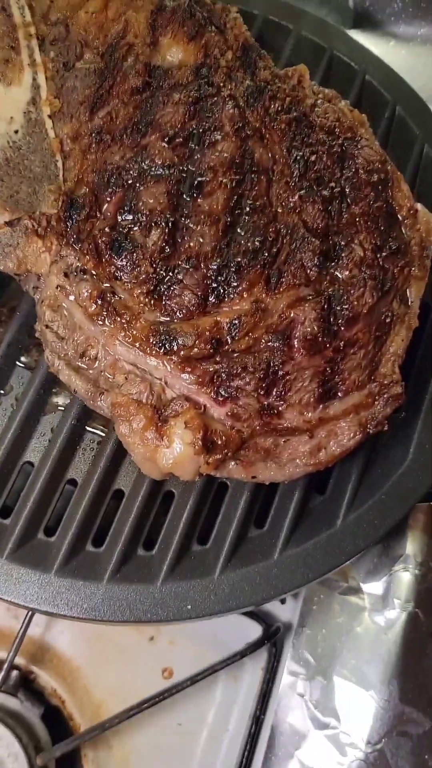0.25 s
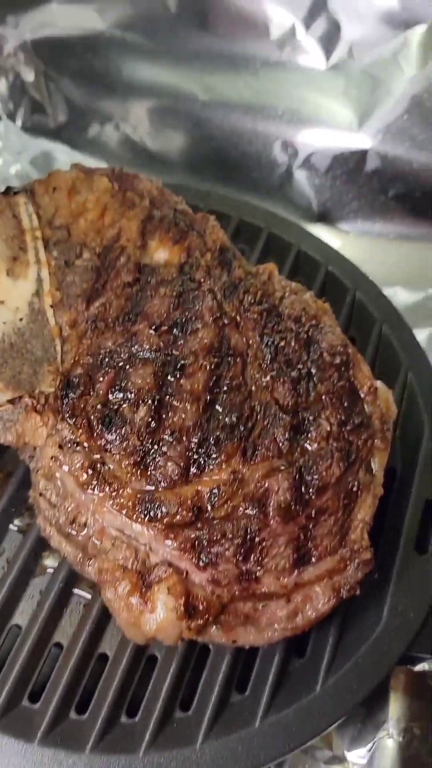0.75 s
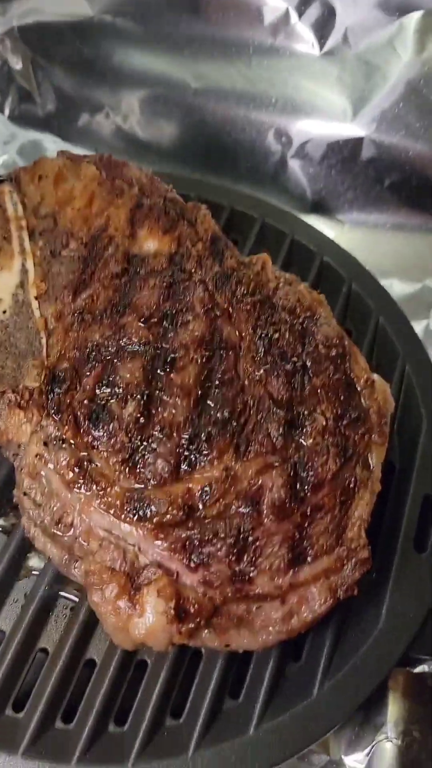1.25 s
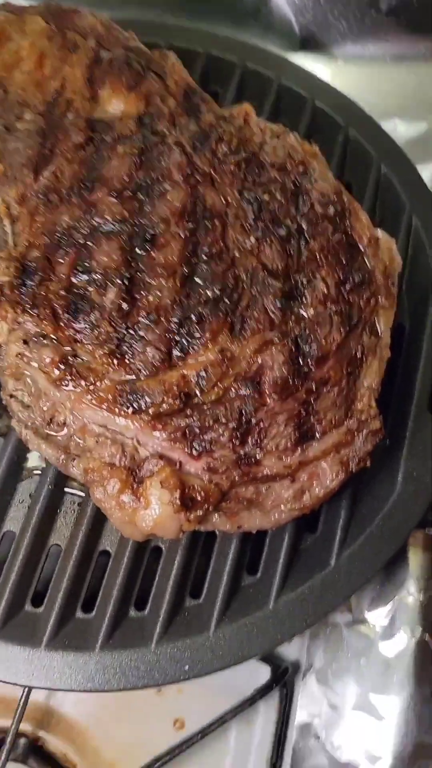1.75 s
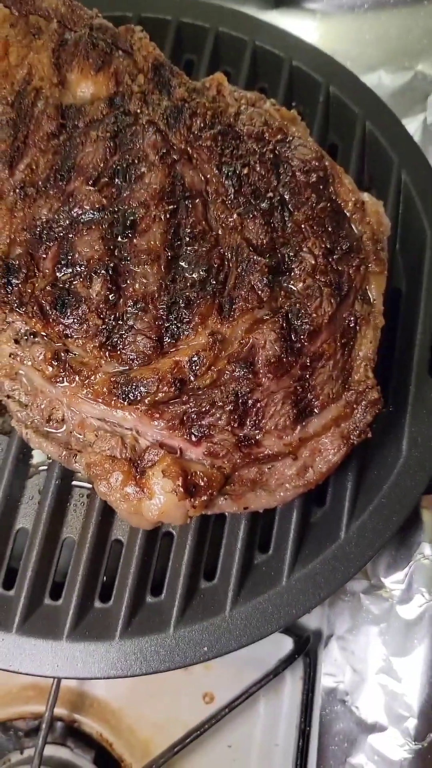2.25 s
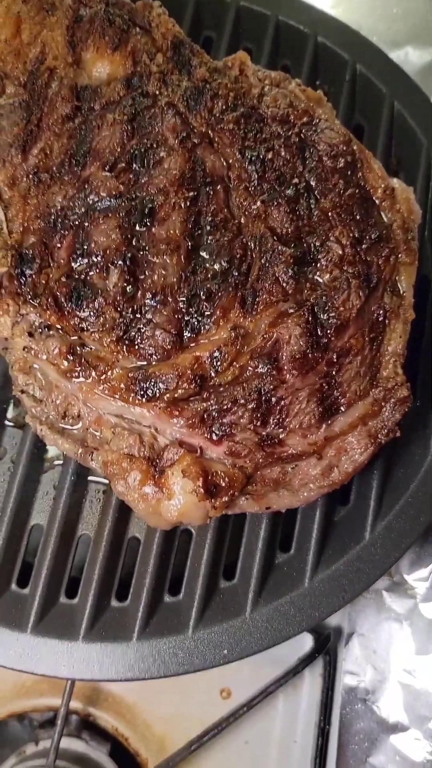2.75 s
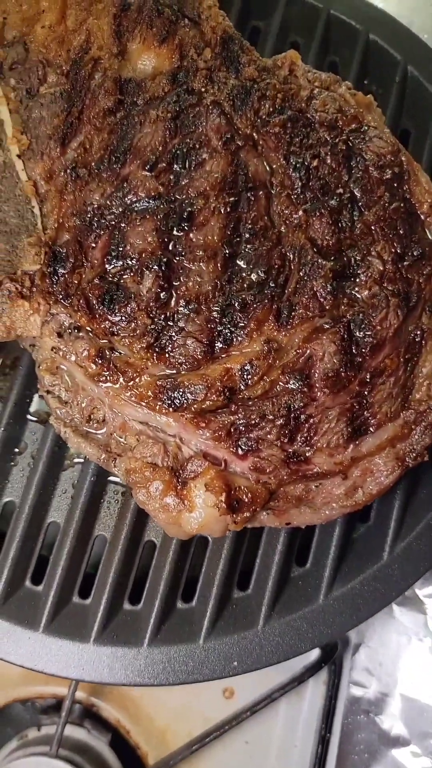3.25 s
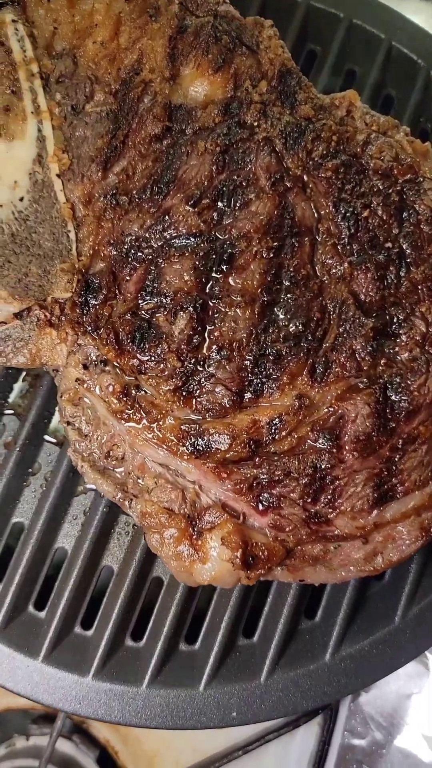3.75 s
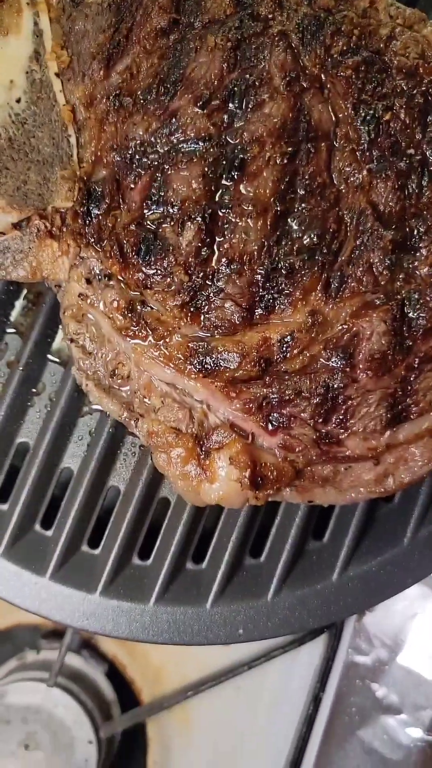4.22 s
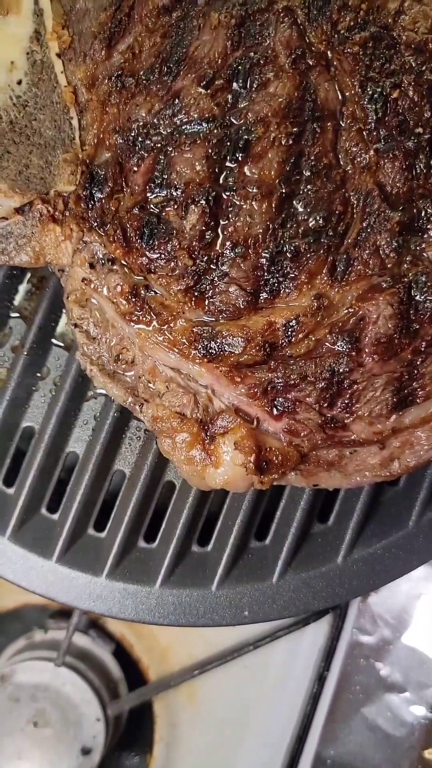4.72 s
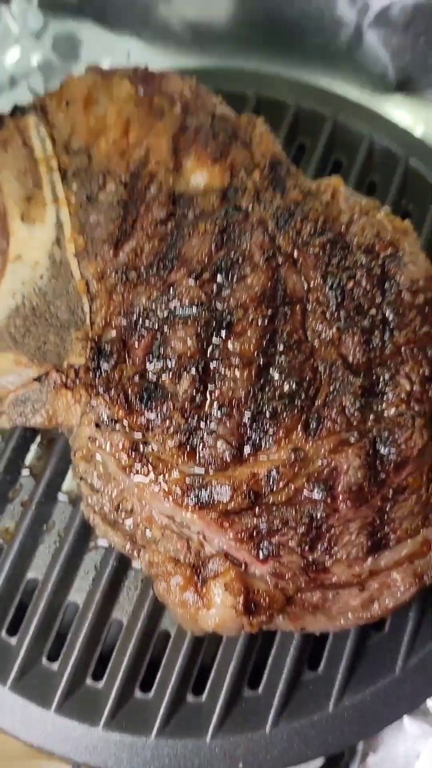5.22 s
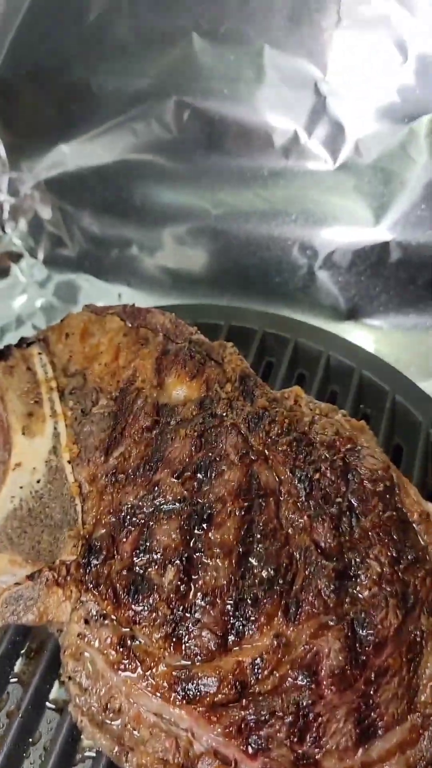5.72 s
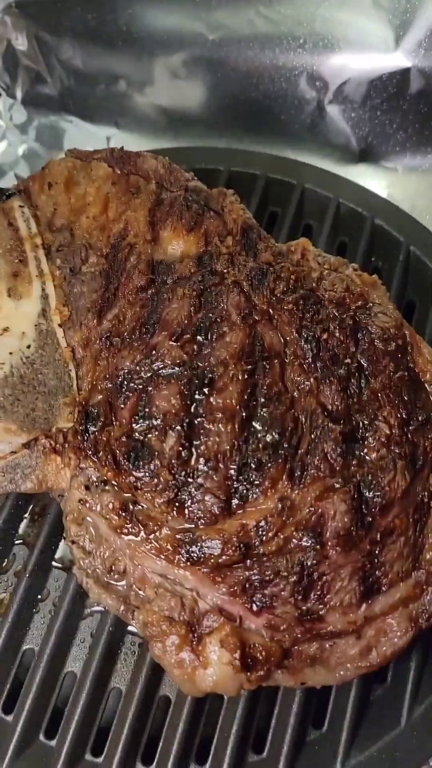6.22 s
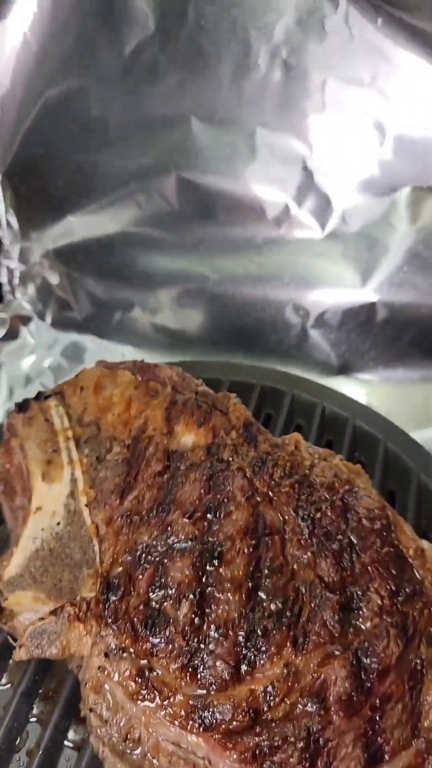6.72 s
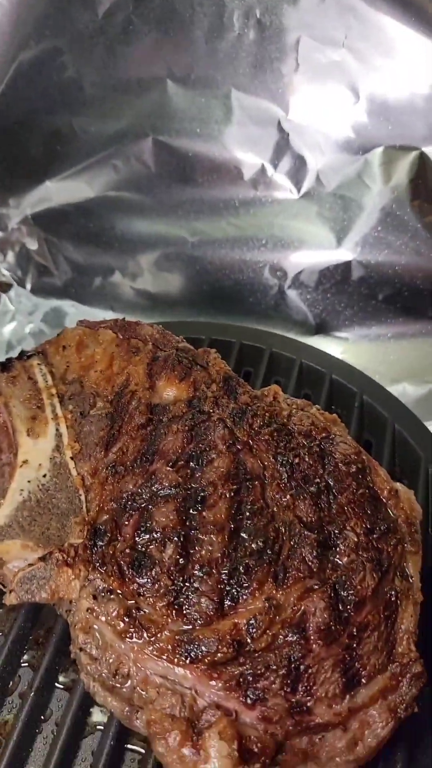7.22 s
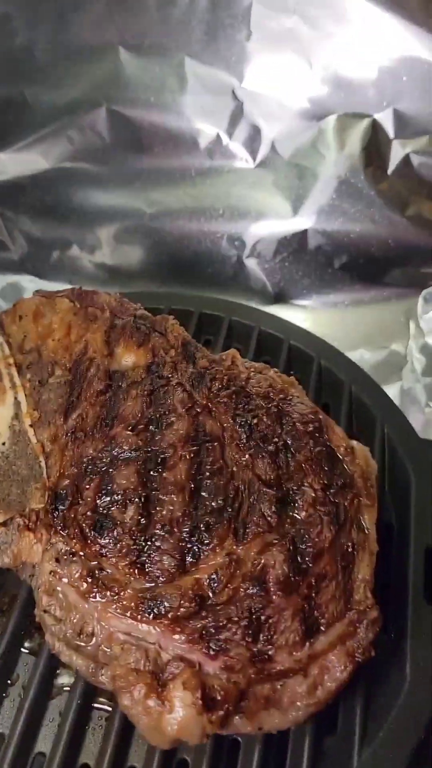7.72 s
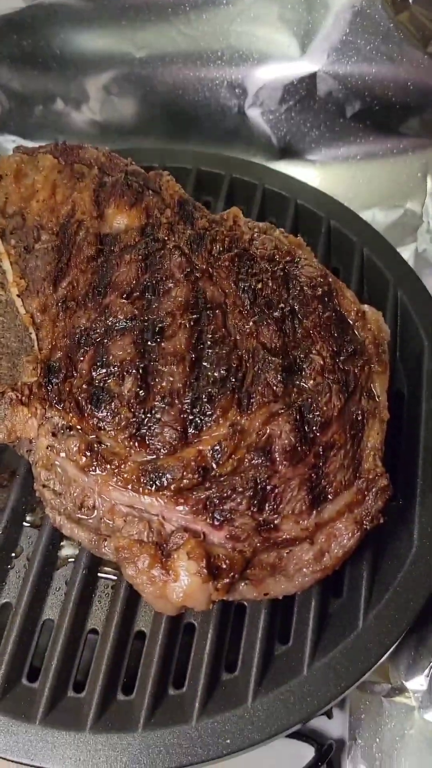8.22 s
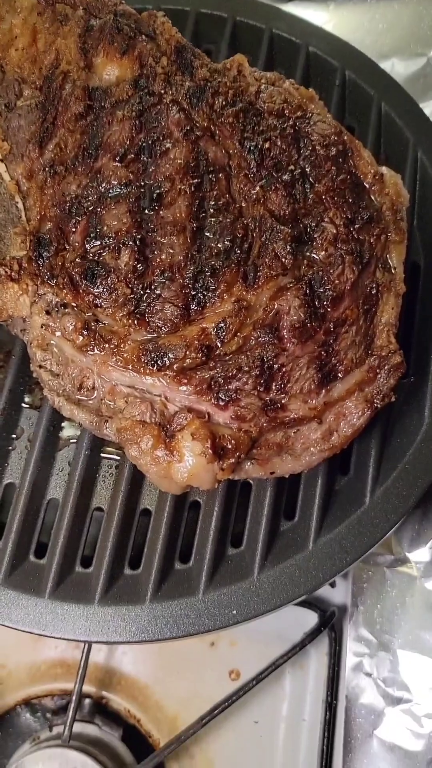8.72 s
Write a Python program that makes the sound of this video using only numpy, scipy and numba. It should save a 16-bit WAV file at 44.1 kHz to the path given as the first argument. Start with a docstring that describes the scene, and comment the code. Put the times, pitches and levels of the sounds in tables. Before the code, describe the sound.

A hand-held phone hovers close above a ridged pan where meat sizzles steadily. Sharp droplets snap often at first; then dripping fat bursts into a fierce hissing swell with a heavy pop and wet splats. The fine spray dies first, leaving coarser bubbling that eases down. A smaller swell comes midway, then even sizzle and light pops, over soft kitchen rumble and motor hum.

```python
"""A steak fries on a ridged pan over a gas burner, a hand-held phone moving close above it.
Steam bubbles, modelled as decaying sines, burst in dense flurries over a noise-like hiss.
Dripping fat flares up with bands that decay at unequal rates; large bubbles ring, droplets crack,
pores sputter, juice splats as filtered noise, and bubbles trapped between ridges knock.
Pan and foil smear the bursts by dense reflections; motor hum and noise-like rumble lie below."""
import sys
import numpy as np
from scipy import signal
from scipy.fft import rfft, irfft
from scipy.io import wavfile
from scipy.ndimage import uniform_filter1d
from numba import njit

SR = 44100
rng = np.random.default_rng(int(sys.argv[2]) if len(sys.argv) > 2 else 0)


def transcribe(u):
    """Save the signal u as a 16-bit wav file named by the first command-line argument.

    u: samples, shape (n,) or (channels, n), limited to [-1, 1]; the rate is SR.
    q: integer samples, one column per channel.
    """
    v = np.clip(np.atleast_2d(u).T, -1, 1)
    q = np.round(v * 32767).astype(np.int16)
    wavfile.write(sys.argv[1], SR, q)


def amplitude_ratio(level_db):
    """Convert a level in decibels to the matching linear amplitude (field) ratio."""
    exponent = np.asarray(level_db, float) / 20
    return 10 ** exponent


N = 395577
T = np.arange(N) / SR
HZ = np.arange(N // 2 + 1) * SR / N + 1e-3  # never zero, for the logarithms

# relative spectral density of steady frying and of a flare: [f/Hz, level/dB]
FRY_COLOUR = [(300, -15.5), (600, -12.5), (1000, -10), (1400, -8), (1650, -7.5), (1900, -4), (2700, -3),
              (3400, -2), (5200, -2), (7300, -1.5), (8200, -5.5), (10300, -11), (12500, -6), (14700, -1.5)]
FLARE_COLOUR = [(300, -24), (600, -20), (1000, -7.5), (1500, -13), (2200, -4), (2900, -0.5), (3500, 6.5),
                (4200, -1), (4900, 5), (5900, 4.5), (7200, 1.5), (8300, -4), (9600, -6.5), (11000, -1),
                (12500, 6), (14000, 11.5), (15500, -2.5)]
# resonances of the air under the pan and between its ridges: [f/Hz, width/Hz, relative lift/dB]
AIR_RESONANCES = [(1170, 165, 10), (2240, 90, 3)]
# lower microphone (left) against upper one (right): [f/Hz, left minus right level/dB]
EAR_BALANCE = [(60, -3.5), (110, 2.5), (200, -10), (380, -6.5), (700, 1.5), (1290, 2.5), (2380, 0),
               (4400, -1.0), (8120, 2), (11500, -4.5), (15000, -7)]
# places of steady frying and of flaring: [left lag/samples, relative level/dB]
FRY_SPOTS = [(6, 0), (-12, -3), (22, -2), (-35, -6)]
FLARE_SPOTS = [(-5, 0), (-14, -2), (36, -5)]
# the phone's moves over the steady frying: [t/s, level/dB, treble lift as it faces the pan/dB,
# treble left minus right/dB, thinning of the middle band/dB, lift of the air under the pan/dB]
PHONE_MOVES = [(0, -31, 7, -11.5, -3, 2.5), (.6, -33, 5.5, -14, 1.5, 1), (1.4, -31, 5, -13.5, 0, 0.5),
               (1.68, -33, 6.5, -11, 2, 2), (2.7, -32.5, 5, -11.5, -1, 1), (3.4, -34.5, 7.5, -7.5, -6, 2),
               (4.0, -34, 3, -8, -4.5, 3.5), (4.4, -32.5, 3.5, -7, -8.5, 5), (4.6, -35, 4.5, -6, -6, 3.5),
               (4.75, -32.5, 2.5, -6, -8, 1), (4.91, -36, 7, -7, -6, 5), (5.0, -30.5, 2.5, -4, -8, 1),
               (5.45, -33.5, 6, -7, 0, 3.5), (5.9, -34, 5.5, -9, 0, 2.5), (6.45, -36, 5, -8.5, 1, 4.5),
               (6.9, -33, 5, -8.5, -0.5, 4), (7.6, -35.5, 6, -9, -1.5, 3), (8.3, -34.5, 3.5, -8.5, 0, 1.5),
               (8.97, -34, 4.5, -9, -2.5, 3.5)]
# fat dripping on hot metal flares up:
# [t/s, level/dB, rise/s, base t60/s, whine of middling bubbles/dB]
FLARES = [(1.714, -22.5, 0.036, 8.5, -3.5), (1.716, -28, .012, 1.0, -18), (1.84, -23, 0.095, 2.8, 8.5),
          (2.4, -34, 0.095, 5, 11.5), (4.99, -30, 0.19, 1.1, 2), (3.75, -48, 0.055, 2, -2),
          (4.28, -39, .06, 1.2, 1), (4.62, -40, .03, 1.5, 5), (6.62, -38.5, .1, 3, 2),
          (8.15, -40, 0.04, 2.5, -8)]
# relative spectral density of burner and room rumble: [f/Hz, level/dB]
KITCHEN_COLOUR = [(20, -32), (40, -2), (60, -13), (100, -5), (140, -11), (200, -24), (260, -17.5),
                  (380, -27), (550, -18), (900, -30), (2000, -28)]
# motor hum: [f/Hz, rms level/dB, width of its noise ring/Hz]
MOTOR_HUM = [(70, -58, 9), (118.6, -54, 9), (157.5, -61, 8), (317, -72, 8)]
# thumps as the hand shifts: [t/s, level/dB, 1/e half-length/s]
HAND_THUMPS = [(0.03, -58, 0.17), (1.613, -46.5, 0.049), (6.07, -57, 0.087), (6.827, -57, 0.13),
               (8.614, -42, 0.012)]
# the loudest droplet cracks: [t/s, nominal level/dB]
DROPLET_CRACKS = [(0.1136, -30), (0.179, -20), (0.196, -19), (0.2209, -25), (0.234, -19), (0.352, -20),
                  (0.4359, -13), (0.4575, -17), (0.5062, -20), (0.5595, -18.5), (0.597, -20), (0.6355, -24),
                  (0.7053, -22), (0.8315, -24), (0.854, -24), (0.8949, -17), (0.9344, -20), (1.0256, -11),
                  (1.1338, -21), (1.1977, -17), (1.2521, -26), (1.28, -22), (1.3773, -18), (1.401, -12.5),
                  (1.5713, -22), (1.6651, -24), (1.718, -23), (1.7434, -15), (2.8614, -18), (3.8402, -20),
                  (4.148, -21), (4.2702, -30), (4.2926, -30), (4.6329, -30), (4.8589, -20), (4.9516, -15),
                  (4.9604, -21), (5.5019, -22), (5.5992, -28.5), (6.028, -20), (6.2228, -18), (6.3749, -19),
                  (6.4293, -23), (6.557, -25), (6.8593, -23), (6.8788, -25), (7.0259, -26), (7.0324, -21),
                  (7.1122, -20), (7.1985, -26.5), (7.466, -29), (7.7454, -26), (7.7732, -18), (7.9678, -24),
                  (7.9864, -24), (7.9974, -24), (8.0336, -21), (8.2194, -24), (8.2367, -18), (8.2596, -28),
                  (8.3943, -26), (8.4254, -19), (8.4771, -27), (8.5724, -20), (8.6495, -23), (8.7565, -24),
                  (8.7834, -20)]
# large bubbles: [t/s, nominal level/dB, f/Hz, left minus right level/dB]
LARGE_BUBBLES = [(0.3511, -19, 6290, -5), (0.5594, -23, 7300, -16), (0.7524, -25, 7350, -9),
                 (0.8957, -33, 5900, -8), (1.0251, -14, 6700, -15), (1.1326, -20, 6750, -8),
                 (1.2344, -18, 4700, -11), (1.3768, -19, 5740, -13), (1.3999, -30, 6900, -20),
                 (1.7171, -16, 3270, -3), (1.8932, -0.5, 3670, 8.5), (2.596, -29, 5770, 1),
                 (2.8399, -32, 2600, -3), (2.8614, -13, 6300, -13), (3.1644, -18.5, 3700, 7),
                 (3.8282, -18.5, 3370, 4), (4.0426, -34, 1500, -2), (4.1244, -25, 3160, 5),
                 (4.793, -21, 5300, 5), (4.9509, -29, 7200, 2), (4.9817, -14, 5400, 3),
                 (5.4976, -18, 7200, -7), (5.7424, -21, 6930, 2), (5.8456, -20, 4650, -10),
                 (6.3745, -23, 2600, 3), (6.6514, -22, 3240, -3), (7.0263, -21, 6880, -4),
                 (7.774, -21.5, 3370, -11), (7.9, -20.5, 3230, -3), (8.175, -22, 4000, -3),
                 (8.2364, -17.5, 3580, -8), (8.3614, -18.5, 3260, -4), (8.394, -21, 5760, 11),
                 (8.62, -23, 3000, -2), (8.7843, -15, 4900, 4)]
# pores each sputtering on a note of their own: [t/s, length/s, nominal f/Hz, rms level/dB]
PORES = [(1.735, .08, 3500, -45), (1.725, .06, 2250, -48), (4.632, 0.15, 5270, -43),
         (3.148, 0.11, 3630, -48), (5.01, 0.15, 3300, -50), (5.17, .15, 3250, -55), (5.115, .13, 7200, -45),
         (8.178, 0.05, 7420, -49), (8.32, .07, 3700, -50)]
# dull splats of juice: [t/s, rms level before the envelope/dB, f/Hz, t60/s]
JUICE_SPLATS = [(1.873, -32, 600, 0.06), (1.893, -28, 950, 0.086), (1.895, -38, 330, 0.15),
                (1.906, -32, 800, 0.06), (2.69, -42, 420, 0.2), (2.715, -41, 500, 0.2),
                (2.76, -38, 1680, 0.04), (4.042, -37, 800, 0.06), (5.496, -33, 600, 0.036),
                (5.498, -23.5, 1800, 0.021), (5.846, -30.5, 3210, 0.038), (6.696, -35, 1200, 0.052),
                (6.807, -38.5, 560, 0.079), (6.824, -36, 336, 0.16), (7.312, -40, 1150, 0.04)]
# knocks of a bubble trapped between ridges: [t/s, nominal level/dB, f/Hz, decay/cycles]
TRAPPED_BUBBLES = [(2.8392, -21.5, 1800, 4.5), (3.978, -31, 1820, 5), (4.005, -31, 1810, 5),
                   (4.0425, -31, 1900, 4), (4.048, -32, 1750, 4), (4.562, -29.5, 1870, 4.6),
                   (6.375, -30, 2200, 3)]


def level(x, db):
    """Root-mean-square normalisation to a level in dB."""
    return x * amplitude_ratio(db) / np.sqrt(np.mean(x ** 2))


def balance(db):
    """Level difference between ears: gains of left and right that differ by db."""
    return amplitude_ratio(db * np.array([[.5], [-.5]]))


def along_hz(points):
    """Interpolation of (Hz, value) points on a logarithmic frequency axis."""
    hz, value = np.transpose(points)
    return np.interp(np.log(HZ), np.log(hz), value)


def walk(rate):
    """Sample-and-hold noise: levels held 1 / rate s and smoothed twice; spread near 1."""
    held = int(SR / rate)
    steps = np.repeat(rng.standard_normal(N // held + 1), held)
    smooth = uniform_filter1d(uniform_filter1d(steps, held), held)
    return 1.3 * smooth[:N]


@njit
def bubbles(n, start, hz, cycles, gain):
    """Damped oscillation: each sine swells within a cycle and falls by 1/e in the given cycles."""
    out = np.zeros(n)
    for k in range(len(start)):
        turn = np.exp((2j * np.pi - 1 / cycles[k]) * hz[k] / SR)
        rise = np.exp(-2 * hz[k] / SR)
        z, held, i = gain[k] + 0j, 1., start[k]
        while i < n and abs(z) > .004 * gain[k]:
            out[i] += z.imag * (1 - held)
            z, held, i = z * turn, held * rise, i + 1
    return out


def foil(x, lag, t60_s, wet_db):
    """Diffuse reflection: left-lagged direct sound plus independent decaying echoes at each ear."""
    t = np.arange(4096) / SR
    decay = np.exp(-np.log(1000) * t / t60_s) * (t > .0004)
    echo = rng.standard_normal((2, len(t))) * decay
    echo = amplitude_ratio(wet_db) * echo / np.sqrt(np.sum(echo ** 2, axis=1, keepdims=True))
    direct = np.array([np.roll(x, int(lag)), x])
    return direct + signal.fftconvolve(x[None], echo, axes=1)[:, :N]


def phone():
    """Distance and facing of the phone: the columns of its moves interpolated in time."""
    s, *columns = np.transpose(PHONE_MOVES)
    return [np.interp(T, s, column) for column in columns]


def swell(lasts, whine):
    """Exponential decay after a linear rise; the powers of concurrent flares add."""
    power = 0
    for s, db, rise_s, t60_s, whine_db in FLARES:
        fall_db = -60 * np.maximum(T - s - rise_s, 0) / (t60_s * lasts)
        rise = np.clip((T - s) / rise_s, 0, 1)
        power = power + (rise * amplitude_ratio(db + whine * whine_db + fall_db)) ** 2
    return np.sqrt(power)


def frying(spots, colour, spread_db, flurry_db, cycles, steam_db, hollow, count):
    """Superposition of random bubble bursts and steam hiss, in flurries at each spot."""
    out = 0
    for lag, db in spots:
        when, pitch, length, strength = rng.random((count, 4)).T
        hz = 900 * 18 ** pitch
        # very loud bursts are rare; higher ones are stronger
        gain = amplitude_ratio(-spread_db * np.log(1 - .997 * strength)) * np.sqrt(hz / 4000)
        start = (when * N).astype(np.int64)
        burst = level(bubbles(N, start, hz, cycles * (0.062 + 1.63 * length), gain), 0)
        hiss = amplitude_ratio(steam_db) * rng.standard_normal(N)
        flurry = amplitude_ratio(flurry_db * (walk(14.) + walk(35.)))
        out = out + amplitude_ratio(db) * foil((burst + hiss) * flurry, lag, t60_s=0.074, wet_db=12.5)
    # flatten the mean spectrum, then impose the colour and the air resonances
    spectrum = rfft(out)
    even = np.sqrt(uniform_filter1d(np.mean(abs(spectrum) ** 2, axis=0), size=1200))
    lift = sum(db / (1 + (2 * (HZ - hz) / width) ** 2) for hz, width, db in AIR_RESONANCES)
    return spectrum / even * amplitude_ratio(along_hz(colour) + hollow * lift) * balance(along_hz(EAR_BALANCE))


def sizzle():
    """Band-dependent damping: flare bands die at unequal rates over frying shaped by the phone."""
    near_db, treble_db, pan_db, thin_db, hollow_db = phone()
    fry = frying(FRY_SPOTS, FRY_COLOUR, spread_db=2.5, flurry_db=1.18, cycles=1.48,
                 steam_db=1.5, hollow=.55, count=6000)
    flare = frying(FLARE_SPOTS, FLARE_COLOUR, spread_db=3.0, flurry_db=.6, cycles=1.94,
                   steam_db=-4.0, hollow=1.1, count=20000)
    fry, flare = (rfft(level(irfft(part, N), 0)) for part in (fry, flare))

    below_4400, below_9600 = (1 / (1 + (HZ / hz) ** 12) for hz in (4400, 9600))
    pan = balance(pan_db - np.mean(pan_db))
    flicker = amplitude_ratio(walk(30.) + walk(70.))  # the fine spray flickers on its own
    fine_fry = amplitude_ratio(treble_db) * pan * flicker * irfft(fry * (1 - below_9600), N)
    steady = amplitude_ratio(near_db) * (irfft(fry * below_9600, N) + fine_fry)

    # large bubbles outlast middling ones; the fine spray dies first
    coarse = swell(1.75, 0) * irfft(flare * below_4400, N)
    middling = swell(0.99, 1) * irfft(flare * (below_9600 - below_4400), N)
    fine = swell(.65, 0) * pan * irfft(flare * (1 - below_9600), N)
    out = steady + coarse + middling + fine

    hollow_hz, hollow_width_hz, _ = AIR_RESONANCES[0]
    hollow = np.exp(-((HZ - hollow_hz) / hollow_width_hz) ** 2)
    thin = np.exp(-((HZ - 2350) / 420) ** 2)  # centre and 1/e half-width in Hz
    spectrum = rfft(out)
    thinning = (amplitude_ratio(thin_db) - 1) * irfft(spectrum * thin, N)
    return out + thinning + (amplitude_ratio(hollow_db) - 1) * irfft(spectrum * hollow, N)


def rumble():
    """Amplitude modulation of the low rumble: a slow waver in dB plus Gaussian thumps."""
    thumps = sum(amplitude_ratio(db) * np.exp(-((T - s) / length_s) ** 2) for s, db, length_s in HAND_THUMPS)
    return amplitude_ratio(-59 + 2.5 * walk(4.1)) + thumps


def kitchen():
    """Interaural coherence: rumble nearly alike at both ears in the bass, under a wavering hum."""
    mid, side = rfft(rng.standard_normal((2, N)))
    ears = np.array([[1], [-1]])
    apart = .7 / np.sqrt(1 + (276 / HZ) ** 4) + .22  # the ears differ more above 276 Hz
    room_lag_s = 0.000597  # the mid sound reaches the upper microphone later
    both = mid * np.exp(1j * np.pi * HZ * room_lag_s * ears) + apart * side * ears
    both = both * amplitude_ratio(along_hz(KITCHEN_COLOUR)) * balance(along_hz(EAR_BALANCE))
    low = 1 / (1 + (HZ / 100) ** 6)
    out = level(irfft(both * (1 - low), N), -49.5) * amplitude_ratio(walk(3.))
    out = out + level(irfft(both * low, N), 0) * rumble()
    for hz, db, width in MOTOR_HUM:
        # narrow-band noise around a steady sine makes it waver
        ring = irfft(rfft(rng.standard_normal(N)) / (1 + (2 * (HZ - hz) / width) ** 2), N)
        out = out + level(level(ring, -9.5) + np.sin(2 * np.pi * hz * T), db)
    return out


def droplet_colour():
    """Spectral shaping: the frying's colour raised by up to 5 dB above about 10 kHz."""
    return amplitude_ratio(along_hz(FRY_COLOUR) + 5 / (1 + (10500 / HZ) ** 12))


def ticks(count):
    """Strongly damped oscillation: scattered droplets exploding on the ridges crack in the treble."""
    when, pitch, strength = rng.random((count, 3)).T
    hz = 5000 * 3.0 ** pitch
    gain = amplitude_ratio(-4.0 * np.log(1 - 0.98 * strength))
    x = bubbles(N, (when * N).astype(np.int64), hz, np.full(count, 0.7), gain)
    smeared = rfft(foil(x, -8, t60_s=0.064, wet_db=-5.0))
    near = irfft(smeared * droplet_colour() * balance(along_hz(EAR_BALANCE)), N)
    near_db = phone()[0]
    return level(near, -10.5) * (amplitude_ratio(near_db) + swell(1.0, 0))


def cracks():
    """Impulsive radiation: a lone droplet explodes as treble noise decaying by 1/e in 0.55 ms."""
    s, db = np.transpose(DROPLET_CRACKS)
    t, out = np.arange(256) / SR, np.zeros(N)
    noise = rng.standard_normal((len(s), len(t))) * np.exp(-t / 0.00055)
    for k, at in enumerate((s * SR).astype(np.int64)):
        # even out the strength of each onset by its sample-to-sample change
        onset = np.std(np.diff(noise[k, :24]))
        out[at:at + len(t)] += amplitude_ratio(db[k]) * noise[k] / onset * 1.27
    out = irfft(rfft(out) * droplet_colour() / (1 + (5500 / HZ) ** 4), N)
    pan_db = phone()[2]
    return foil(out, -7, t60_s=0.019, wet_db=-8.5) * balance(pan_db)


def lesser_pops(count):
    """Uniform random distribution of weaker bubbles, in rows like the large ones."""
    when, strength, pitch, side = rng.random((count, 4)).T
    return np.transpose([when * (N / SR - .1), -35 + 7 * strength, 3000 * 2.5 ** pitch, 10 * side - 7])


def pops():
    """Damped resonance: a large bubble rings briefly at its pitch and throws a short bright spray."""
    s, db, hz, pan_db = np.vstack([LARGE_BUBBLES, lesser_pops(count=30)]).T
    spray_db = -27 + 0.62 * (db + 17.5)  # spray grows more slowly than the pop
    start, t = (s * SR).astype(np.int64), np.arange(2048) / SR
    ring = bubbles(N, start + 15, hz, np.full(len(s), 1.6), amplitude_ratio(db + 1.5))
    noise = rng.standard_normal((len(s), 2, len(t)))
    mist, pan = np.zeros((2, N + len(t))), np.zeros(N + len(t))
    # a sharp crack as the skin tears, then droplets raining down
    crack = np.exp(-t / 0.00054)
    rain = 0.81 * (1 - np.exp(-t / 0.0018)) * np.exp(-np.log(1000) * t / 0.08)
    for k, at in enumerate(start):
        mist[:, at:at + len(t)] += amplitude_ratio(spray_db[k]) * noise[k] * (crack + rain)
        pan[at:at + len(t)] = pan_db[k]
    mist = irfft(rfft(mist[:, :N]) * droplet_colour() * balance(along_hz(EAR_BALANCE)), N)
    high = signal.butter(2, 700, "high", fs=SR, output="sos")
    ring = signal.sosfilt(high, foil(ring, -1, t60_s=0.03, wet_db=-2.0))
    return (ring + mist) * balance(pan[:N])


def lesser_sputters(count):
    """Uniform random distribution of weaker pores, in rows like the listed ones."""
    when, length, pitch, strength = rng.random((count, 4)).T
    return np.transpose([when * (N / SR - .4), .02 + .09 * length,
                         3100 * 2.4 ** pitch, -62 + 5 * strength])


def sputters():
    """Irregular pulse train: one pore emits 40 bubbles of nearly equal pitch in quick succession."""
    out = np.zeros(N)
    for s, length_s, hz, db in np.vstack([PORES, lesser_sputters(count=60)]):
        when, size = rng.random((40, 2)).T
        n = int((length_s + 0.075) * SR)  # room for the last bubbles to ring
        start = (when * length_s * SR).astype(np.int64)
        train = bubbles(n, start, hz * (0.964 + 0.056 * size), np.full(40, 9.), amplitude_ratio(5.7 * size))
        out[int(s * SR):int(s * SR) + n] += level(train, db)
    return foil(out, -11, t60_s=0.025, wet_db=-2.)


def plops():
    """Band-limited noise: juice lands as a ragged burst, earlier and louder on the right."""
    out, t = np.zeros(N), np.arange(8192) / SR
    for s, db, hz, t60_s in JUICE_SPLATS:
        band = signal.butter(1, [hz / 1.6, hz * 1.6], "band", fs=SR, output="sos")
        burst = level(signal.sosfilt(band, rng.standard_normal(len(t))), db)
        envelope = (1 - np.exp(-t * hz / 1.7)) * np.exp(-np.log(1000) * t / t60_s)
        out[int(s * SR):int(s * SR) + len(t)] += burst * envelope
    return foil(out, 13, t60_s=0.035, wet_db=-4.5) * amplitude_ratio(np.array([[-5.], [0.]]))


def knocks():
    """Cavity resonance: a trapped bubble rings a few cycles, band-passed by the air in its groove."""
    s, db, hz, cycles = np.transpose(TRAPPED_BUBBLES)
    ring = bubbles(N, (s * SR).astype(np.int64), hz, cycles, amplitude_ratio(db))
    groove = signal.butter(2, (1450, 2300), "band", fs=SR, output="sos")
    return foil(signal.sosfilt(groove, ring), 3, t60_s=0.052, wet_db=-5.0)


def scene():
    """Linear superposition of the pan close by and the kitchen behind."""
    pan = sizzle() + ticks(count=700) + cracks() + pops() + sputters() + plops() + knocks()
    return pan + kitchen()


def top_cut(x):
    """Nothing passes above the cut-off."""
    return signal.sosfilt(signal.butter(12, 16940, fs=SR, output="sos"), x)


def record(dry):
    """Band limitation: a steep elliptic low-pass filter cuts the treble above 15780 Hz."""
    low_pass = signal.ellip(10, .2, 70, 15780, fs=SR, output="sos")
    finished = signal.sosfilt(low_pass, dry)
    return top_cut(finished)


dry = scene()
out = record(dry)
transcribe(out)
```